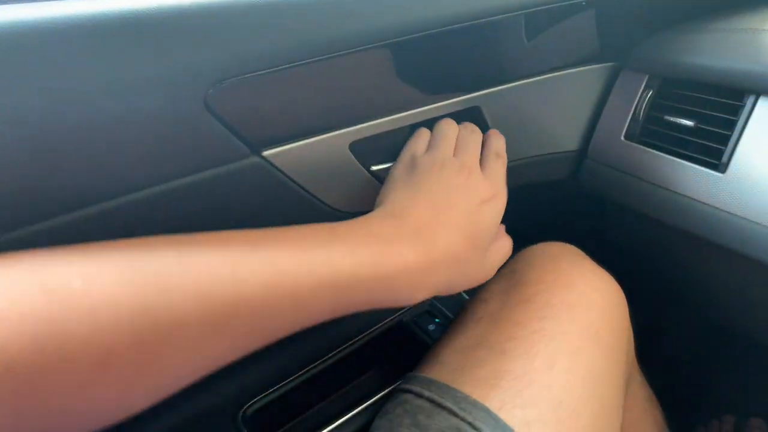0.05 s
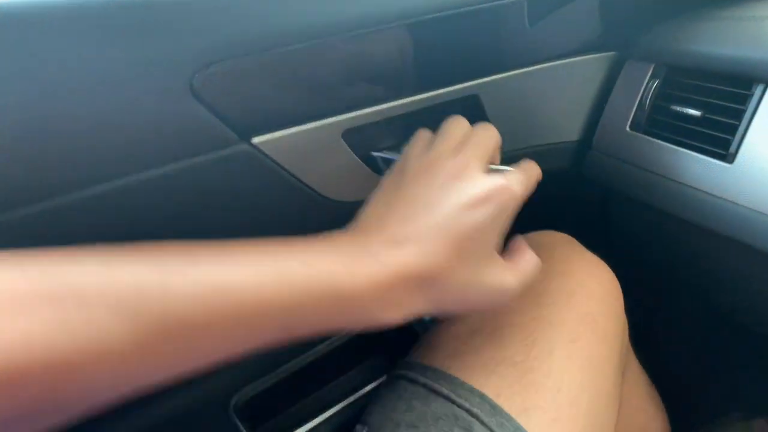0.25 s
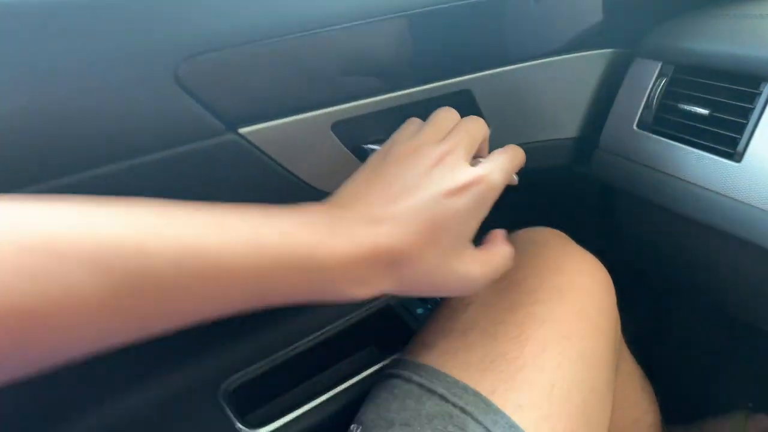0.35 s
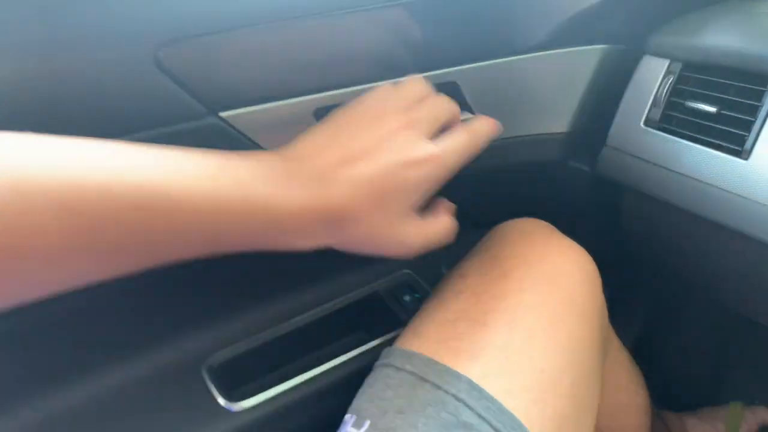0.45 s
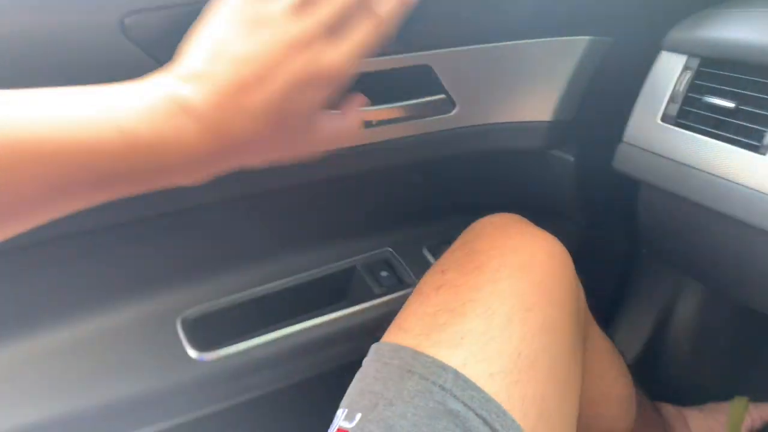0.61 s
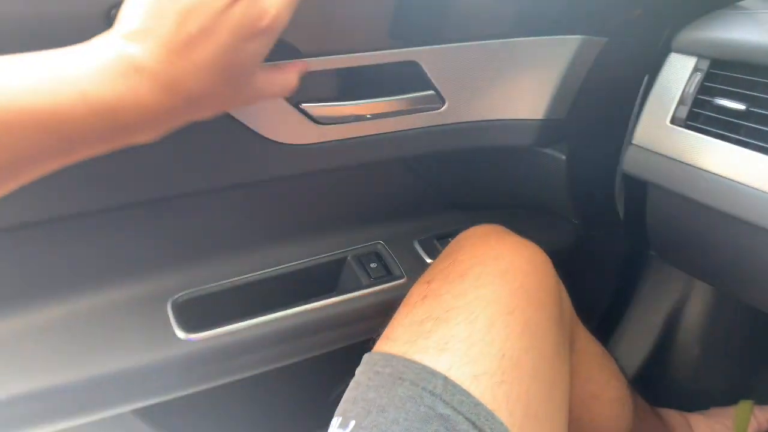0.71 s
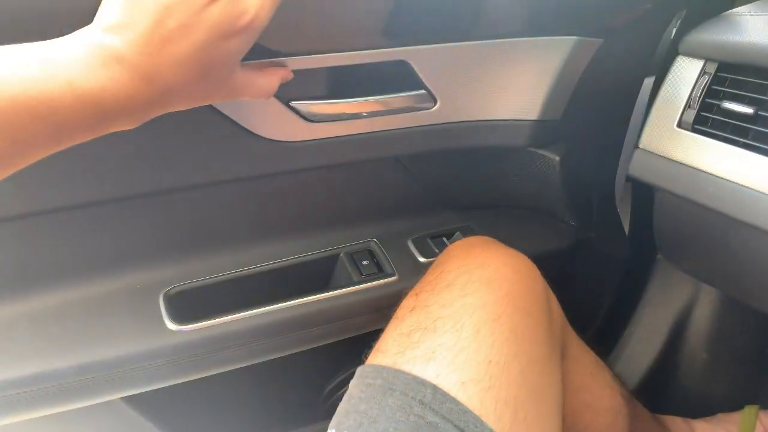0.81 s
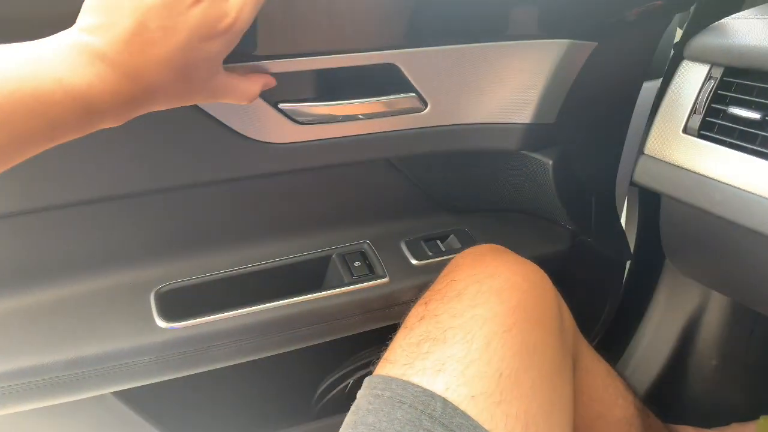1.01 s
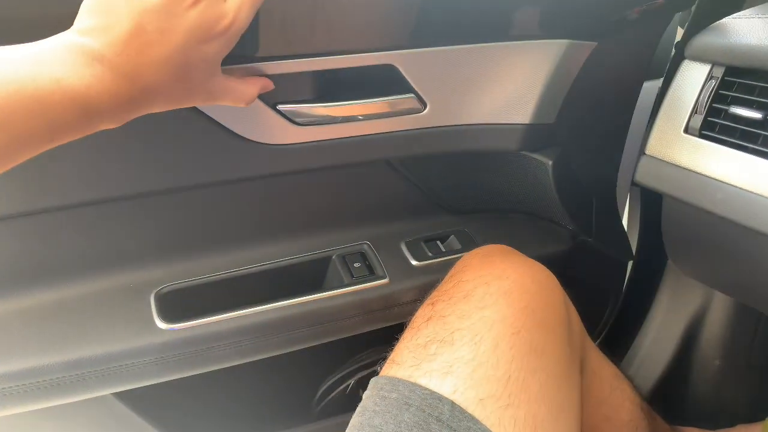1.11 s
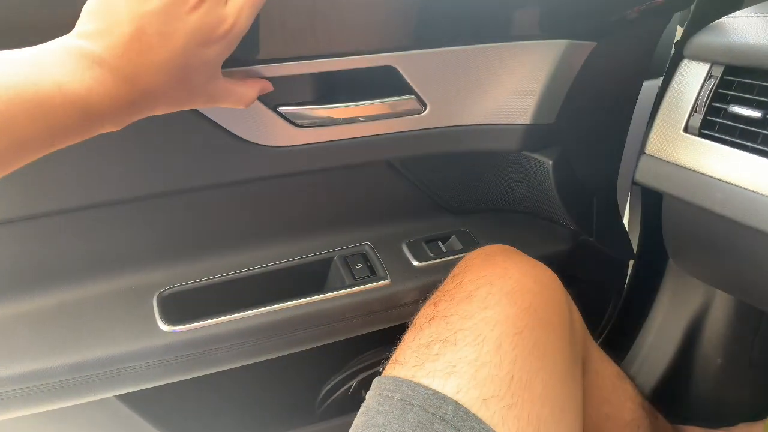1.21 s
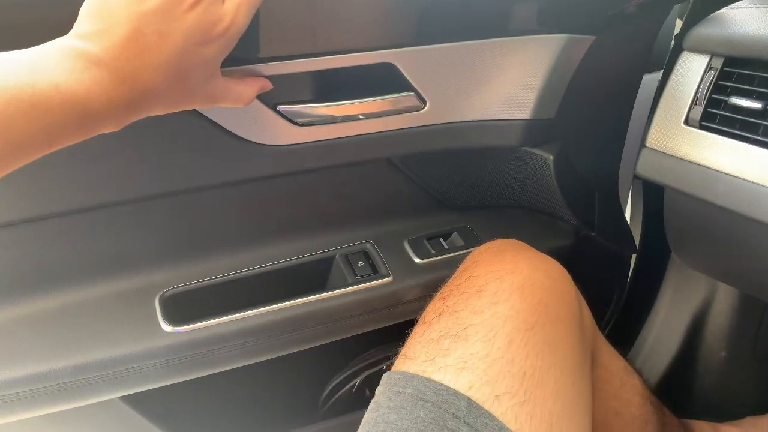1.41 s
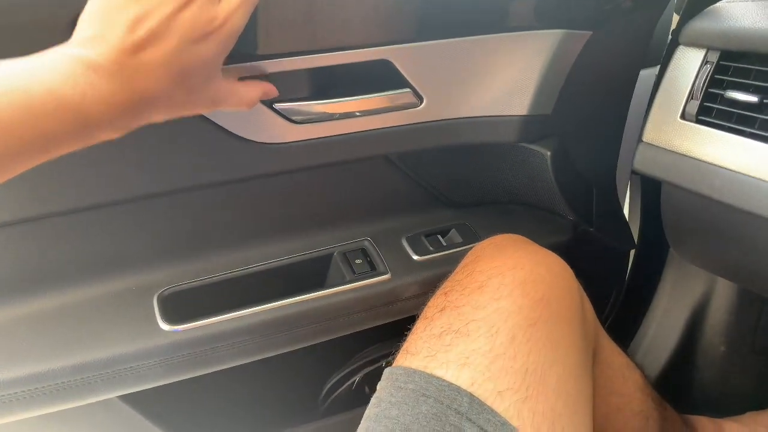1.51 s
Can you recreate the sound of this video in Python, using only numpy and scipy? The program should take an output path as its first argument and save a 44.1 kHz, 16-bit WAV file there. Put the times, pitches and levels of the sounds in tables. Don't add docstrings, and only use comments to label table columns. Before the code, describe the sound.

A car door is opened from inside, heard close in a small, quiet cabin. Faint skin rub and light ticks come first; around 0.2-0.35 s the latch releases in a cluster of dull, woody knocks. At about 0.53 s the handle snaps back with a hard clack, rapid bounces and a short low boom. Faint ticks follow until 0.9 s, while a soft low outside hum grows and stays to 1.5 s.

```python
import sys
import numpy as np
from scipy import signal
from scipy.io import wavfile

SR = 44100
rng = np.random.default_rng(int(sys.argv[2]) if len(sys.argv) > 2 else 0)


def invert_db(level):
    return 10 ** (np.asarray(level, dtype=float) / 20)


def unload_wav(signal):
    wavfile.write(
        sys.argv[1],
        SR,
        np.round(np.clip(np.atleast_2d(signal).T, -1, 1) * 32767).astype(np.int16),
    )


N = 68355
CONTACT_T_S = np.arange(SR // 3) / SR


def rms_one(x):
    return x / np.sqrt(np.mean(x ** 2) + 1e-20)


def drift(rate_hz):
    pole = np.exp(-80 * np.pi * rate_hz / SR)
    white = rng.standard_normal(N // 40 + 2002)
    slow = signal.lfilter([1], [1, -2 * pole, pole * pole], white)[2000:]
    return np.interp(np.arange(N) / 40, np.arange(len(slow)), rms_one(slow))


def band_pass(x, low_hz, high_hz):
    return signal.sosfilt(signal.butter(2, [low_hz, high_hz], "band", fs=SR, output="sos"), x)


def low_pass(x, hz, order=2):
    return signal.lfilter(*signal.butter(order, hz, fs=SR), x)


def resonate(x, hz, t60_s):
    r = invert_db(-60 / (t60_s * SR))
    w = 2 * np.pi * hz / SR
    return signal.lfilter([0, np.sin(w)], [1, -2 * r * np.cos(w), r * r], x + 1e-18)


def banded_noise(spectrum, patchy_db):
    out = 0
    edges_hz = 22 * 2 ** np.arange(0, 9.9, .5)
    points = np.array(spectrum)
    white = rng.standard_normal((2, N + SR // 2))
    for k, (low, high) in enumerate(zip(edges_hz, edges_hz[1:])):
        band = band_pass(white[k % 2], low, high)[-N:]
        db = np.interp(np.log(low * high) / 2, np.log(points[:, 0]), points[:, 1])
        out = out + invert_db(db + patchy_db * drift(3.1)) * band
    return rms_one(out)


def crackle(hz, octaves, grain_db):
    size = len(CONTACT_T_S)
    grains = rng.standard_normal(size) * invert_db(grain_db * np.minimum(rng.exponential(1, size), 5))
    octaves = max(octaves, .1)
    band = band_pass(grains, hz / 2 ** octaves, min(hz * 2 ** octaves, .45 * SR))
    band = low_pass(band, hz, order=1)
    air = invert_db(-26) * min(hz / 6000, 1) * rms_one(grains)
    return rms_one(band) + air


def place(sounds):
    out = np.zeros(N + SR)
    for s, x in sounds:
        i = int(s * SR) + SR // 2
        out[i:i + len(x)] += x
    return out[SR // 2:SR // 2 + N]


def soft_strike(db, hz, t60_s):
    t = CONTACT_T_S
    rise = 1 - np.exp(-t * hz / .3)
    return invert_db(db - 60 * t / t60_s) * rise * np.sin(2 * np.pi * hz * t)


def door_knocks():
    # start [s], peak level [dB], pitch [Hz], t60 [s].
    knock_rows = [(0.206, -29, 327, 0.23), (0.22, -18.5, 132, 0.14), (.241, -9, 360, 0.039),
                  (0.2562, -3, 309, 0.064), (.2567, -8, 600, 0.061), (.2632, -9, 320, 0.033),
                  (0.26, -2, 290, 0.035), (0.272, -10, 107, 0.064), (.281, -3, 264, 0.033),
                  (0.307, -10, 133, 0.048), (.3135, -12, 202, .05), (.286, -14.5, 600, 0.034),
                  (0.346, -21, 113, 0.17), (.385, -16.5, 62, 0.095), (0.419, -24, 121, 0.12),
                  (.44, -24.5, 171, 0.14), (0.521, -15, 114, 0.085), (0.538, -18, 140, .04),
                  (.585, -17, 333, .05), (.603, -20.5, 233, .12), (.561, -11, 280, 0.058),
                  (0.5338, 5.5, 1400, 0.0075), (0.5342, -5, 1960, 0.016), (0.6415, -16, 109, 0.14),
                  (1.43, -27.5, 164, 0.21), (1.485, -25.5, 167, 0.16), (0.873, -22.5, 154.5, 0.21),
                  (1.012, -25.5, 161.5, 0.24), (1.341, -20.5, 160, 0.097)]
    return place((s, soft_strike(db, hz, t60_s)) for s, db, hz, t60_s in knock_rows)


def skin_shoves():
    # centre [s], level [dB], period [s], direction [signed factor].
    shove_rows = [
        (0.272, -8, 0.011, 1),
        (0.3031, -8, 0.012, -0.89),
    ]
    sounds = []
    for s, db, period_s, direction in shove_rows:
        turn = np.clip(CONTACT_T_S / period_s - 1, -1, 1)
        cycle = np.cos(np.pi * turn / 2) ** 2 * np.sin(2 * np.pi * turn)
        sounds.append((s - period_s, direction * invert_db(db) * cycle))
    return place(sounds)


def handle_on_panel():
    # time [s], level [dB].
    landing_rows = [
        (0.5388, -3.5),
        (0.5461, -8),
        (0.554, -22),
        (.563, -8.5),
    ]
    # pitch [Hz], level [dB], t60 [s].
    panel_modes = [(62.4, -12.5, 0.58), (103, -21, 0.35), (184.6, -4, 0.18), (226, -6, 0.11),
                   (256, -4.5, 0.1), (370, -3, 0.065), (600, -20, 0.098), (912, -13, 0.034),
                   (1214, -11, 0.047), (1507, -11, 0.041), (2050, -13, 0.035)]
    clicks = np.zeros(N)
    for s, db in landing_rows:
        clicks[int(s * SR)] = invert_db(db)
    clicks = low_pass(clicks, 1490)
    out = np.zeros(N)
    for k, (hz, db, t60_s) in enumerate(panel_modes):
        out += (-1) ** k * invert_db(db) * resonate(clicks, hz, t60_s)
    return out


def door_skin_boom():
    start_s, length_s, rise_s, t60_s = .5392, .4, .011, .31
    level_db, start_hz, sag_hz_per_s = -4, 123.2, 101
    t = np.clip(np.arange(N) / SR - start_s, 0, length_s)
    envelope = invert_db(level_db - 60 * t / t60_s) * (t < length_s) * (1 - np.exp(-t / rise_s))
    return envelope * np.sin(2 * np.pi * (start_hz - sag_hz_per_s * t / 2) * t)


def trim_pings():
    # start [s], peak level [dB], pitch [Hz], t60 [s].
    ping_rows = [(.1335, -42, 1800, 0.024), (.211, -28, 1140, 0.05), (.5465, -24, 8900, 0.014),
                 (.559, -16, 1143, 0.028), (0.211, -27, 4430, 0.011), (.214, -26.5, 593, 0.048),
                 (0.2328, -18, 1270, 0.017), (.2405, -22.5, 2400, .02), (0.2555, -18, 2850, 0.02),
                 (.2755, -15.5, 1400, 0.03), (0.274, -20, 3440, 0.016), (0.5345, -17, 2600, 0.0065),
                 (0.5368, -13, 4600, 0.0062), (.551, -9.5, 1614, 0.021), (.6293, -41, 5400, 0.0091),
                 (0.674, -40, 3900, 0.014), (.9, -44, 4100, .02), (.5335, -21, 4800, 0.005),
                 (.840, -38, 3680, 0.03), (0.839, -41, 4600, 0.021), (0.8405, -39.5, 3400, 0.03),
                 (0.9007, -38.5, 3660, 0.025), (.26, -18, 1360, 0.022), (.284, -18.5, 1250, .025),
                 (.8405, -40, 7900, 0.016)]
    return place((s, soft_strike(db, hz, t60_s)) for s, db, hz, t60_s in ping_rows)


def hard_ticks():
    # start [s], peak level [dB], centre [Hz], t60 [s], half width [octaves].
    tick_rows = [(0.13, -40, 5330, 0.018, 0.62), (0.15, -42, 5200, 0.017, 0.72),
                 (0.15, -41.5, 1400, .035, .5), (.2065, -32, 4700, 0.03, 0.62),
                 (.207, -42, 13000, .025, .5), (.2105, -33, 12000, 0.013, .5),
                 (.2105, -27, 5400, .015, 0.4), (0.21, -29.5, 4200, 0.063, 2.9),
                 (0.22, -37, 9300, 0.03, 1.3), (0.23, -23.5, 1800, 0.039, 1.3),
                 (0.23, -27, 1750, 0.045, 0.8), (0.25, -29.5, 2900, 0.099, 0.74),
                 (.2605, -36, 11500, .015, .5), (0.239, -37, 6500, 0.023, .8), (0.27, -33, 5500, 0.018, .6),
                 (.284, -38, 13000, .02, .6), (0.27, -28, 2470, 0.038, 1.2),
                 (0.291, -25.5, 10600, 0.0063, 0.66), (0.298, -34, 1700, 0.11, 1.4),
                 (0.3436, -35.5, 1400, 0.089, 0.93), (0.533, -15, 4100, 0.011, 1),
                 (.5335, -27, 8500, 0.013, .6), (.5325, -28, 11400, 0.033, .3),
                 (.5365, -15.5, 4650, 0.017, 0.46), (0.5348, -17, 3100, 0.051, 0.96),
                 (0.5455, -25, 8900, 0.018, .2), (0.54, -28, 6900, 0.11, 2.6),
                 (.550, -17, 1460, 0.055, 0.64), (0.628, -41, 1500, 0.03, 0.25),
                 (0.6735, -45.5, 5800, 0.062, 2.5), (0.76, -39, 2700, 0.047, 1.7),
                 (0.77, -42, 9050, 0.038, 2.3), (0.83, -36.5, 2200, 0.046, 1.2),
                 (0.8995, -42.5, 7700, 0.042, 1.3), (0.3427, -45, 10000, .035, 1.2),
                 (.909, -51, 8000, 0.022, 1.1), (0.38, -46.5, 5300, 0.017, .4)]
    t = CONTACT_T_S
    attack = np.minimum(t / .0004, 1)
    sounds = []
    for s, db, hz, t60_s, octaves in tick_rows:
        sounds.append((s, invert_db(db - 60 * t / t60_s) * attack * crackle(hz, octaves, grain_db=2.6)))
    return place(sounds)


def rubs():
    # start [s], length [s], level [dB], centre [Hz], half width [octaves].
    rub_rows = [(-0.034, 0.14, -42.5, 2900, 1.24), (.03, .07, -47.5, 1370, 0.17),
                (-0.013, 0.1, -54.5, 11000, 0.73), (0.134, 0.034, -46.5, 3000, 1.2),
                (0.262, 0.06, -43, 13000, .7), (0.21, 0.059, -45, 8600, 2.3),
                (0.23, 0.026, -28, 1270, 0.93), (.252, 0.077, -24.5, 1140, 1.8),
                (.3, 0.12, -58.5, 9000, 1.2), (0.366, 0.069, -52, 7900, 1.4), (.383, 0.032, -47, 7600, 1.1),
                (.235, 0.028, -50, 10000, .8), (0.38, 0.38, -57, 4400, 0.73),
                (0.518, 0.024, -36, 1700, 1.9), (.534, 0.04, -38, 12300, .3),
                (.54, 0.043, -34.5, 5100, 0.92), (0.694, 0.17, -48.5, 15700, 0.5),
                (.74, 0.08, -49.5, 13000, 1.6), (0.66, 0.24, -50.5, 5600, 1.7),
                (.3, 0.099, -30.5, 246, 0.76), (.54, 0.05, -25, 700, 0.4), (.523, 0.011, -45, 9800, 0.99),
                (.25, 0.052, -19.5, 457, 0.56)]
    t = CONTACT_T_S
    sounds = []
    for s, length_s, db, hz, octaves in rub_rows:
        phase = np.clip(t / length_s, 0, 1) ** .57
        swell = np.sin(np.pi * phase) ** 1.6 * (t < length_s)
        swell = swell * invert_db(1.2 * drift(80)[:len(t)])
        sounds.append((s, invert_db(db) * swell * crackle(hz, octaves, grain_db=2.0)))
    return place(sounds)


def cabin_air_modes():
    # pitch [Hz], width [Hz], level [dB].
    air_modes = [(83, 11.6, -40.5), (168.9, 7.8, -39), (233.5, 22, -45.5), (298.5, 17, -45),
                 (402.5, 31, -50.5)]
    out = np.zeros(N)
    for hz, width_hz, db in air_modes:
        level = invert_db(db + 1.9 * drift(8.7))
        mode = resonate(rng.standard_normal(N + SR), hz, 2.28 / width_hz)[SR:]
        out += level * rms_one(mode)
    return out


def background_hum():
    # time [s], gain [dB].
    opening_rows = [(0, -18), (.2, -7), (.45, -2), (.62, -2), (0.752, 1.5), (.95, 0.5), (1.55, 1)]
    # frequency [Hz], band gain [dB].
    outside_spectrum = [(15, -65), (25, -48), (74, -18), (124, -29.5), (163, -2.5), (196, -13.5),
                        (295, -16), (1150, -21.5), (16400, -57.5)]
    # frequency [Hz], band gain [dB].
    cabin_spectrum = [(25, -38), (60, 0), (150, -2), (260, -12.5), (500, -17), (2200, -49), (10000, -54),
                      (16400, -66)]
    opening_db = np.interp(np.arange(N) / SR, *np.transpose(opening_rows))
    modes = invert_db(.35 * opening_db) * cabin_air_modes()
    outside = low_pass(banded_noise(outside_spectrum, patchy_db=1.0), 12200)
    cabin = invert_db(-38) * banded_noise(cabin_spectrum, patchy_db=-1.0)
    return invert_db(-41.5 + opening_db) * outside + modes + cabin


def scene():
    door = door_knocks() + skin_shoves() + handle_on_panel() + door_skin_boom()
    details = trim_pings() + hard_ticks() + rubs()
    return (door + details + background_hum())[None]


def roll_off(x):
    return signal.sosfilt(signal.butter(12, 16510, fs=SR, output="sos"), x)


def record(dry):
    bass_cut = signal.butter(2, 31, "high", fs=SR, output="sos")
    top_cut = signal.ellip(10, .5, 45, 15800, fs=SR, output="sos")
    rounded = 1.096 * np.tanh(signal.sosfilt(bass_cut, dry) / 1.1)
    return roll_off(signal.sosfilt(top_cut, rounded))


dry = scene()
out = record(dry)
unload_wav(out)
```